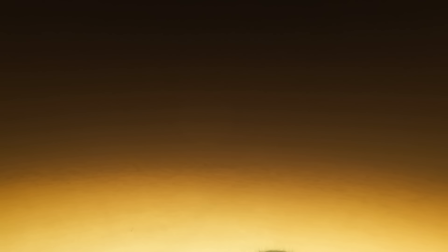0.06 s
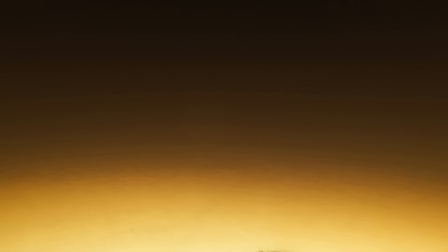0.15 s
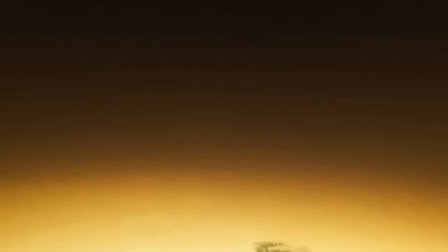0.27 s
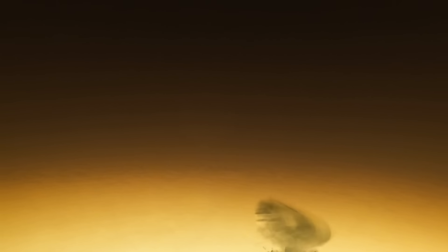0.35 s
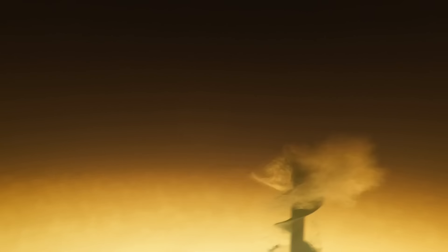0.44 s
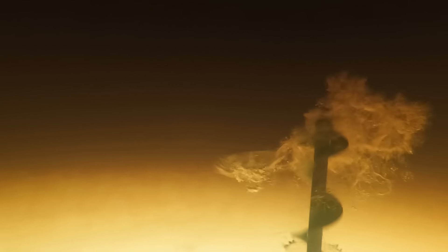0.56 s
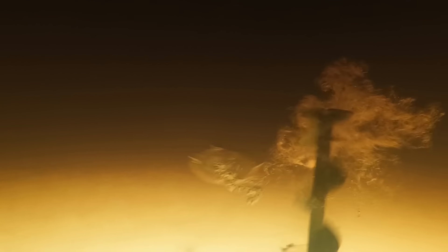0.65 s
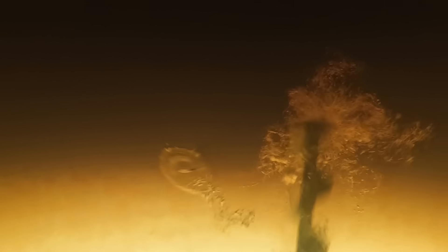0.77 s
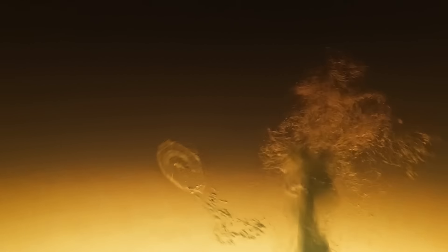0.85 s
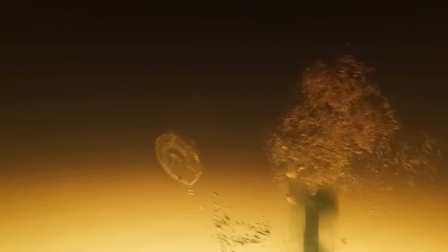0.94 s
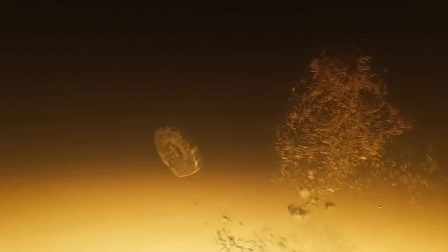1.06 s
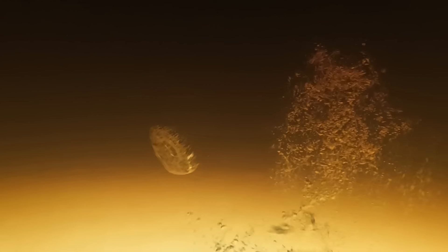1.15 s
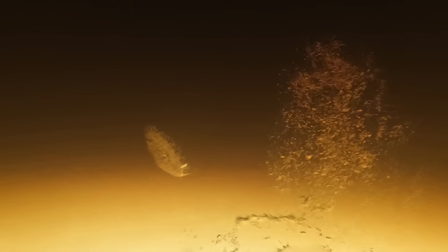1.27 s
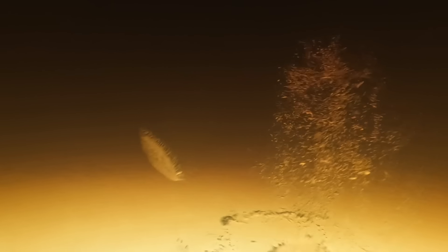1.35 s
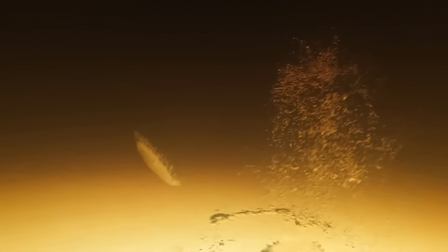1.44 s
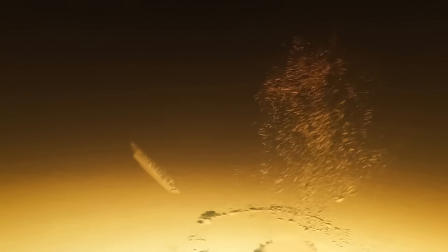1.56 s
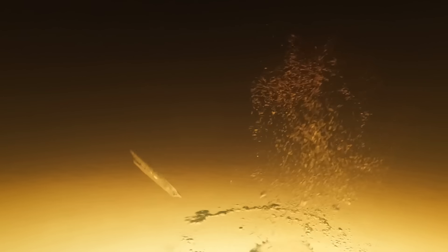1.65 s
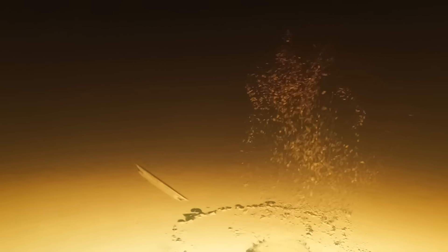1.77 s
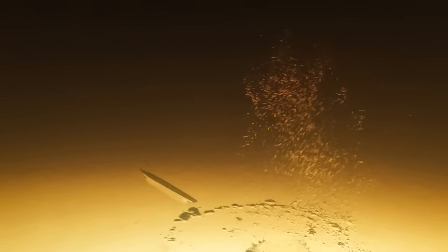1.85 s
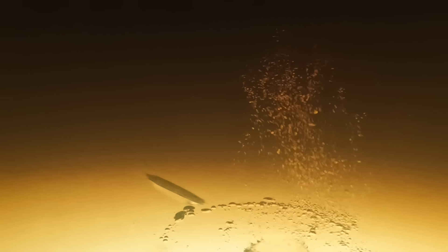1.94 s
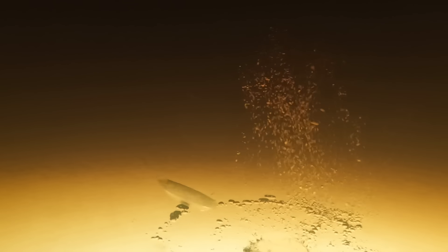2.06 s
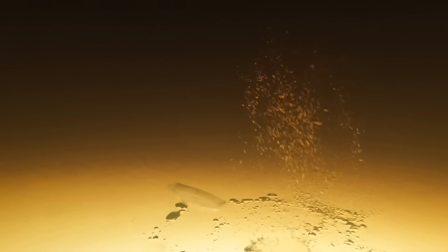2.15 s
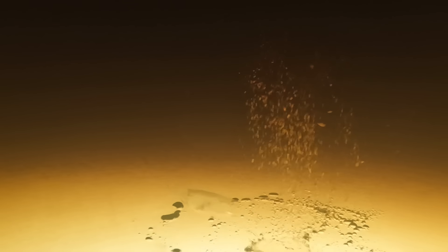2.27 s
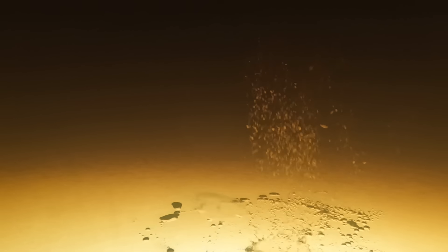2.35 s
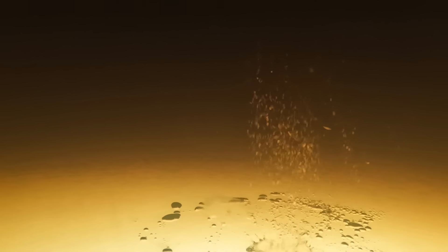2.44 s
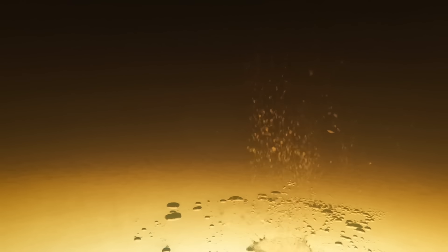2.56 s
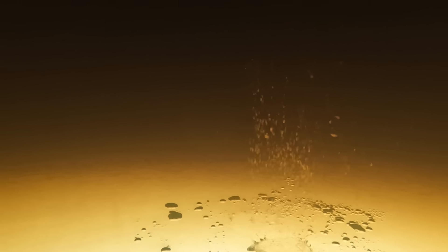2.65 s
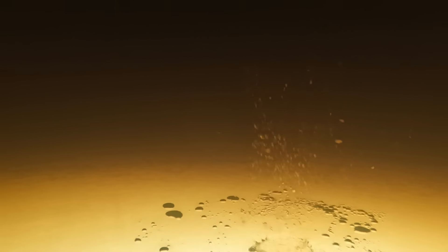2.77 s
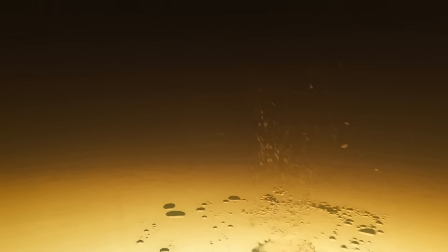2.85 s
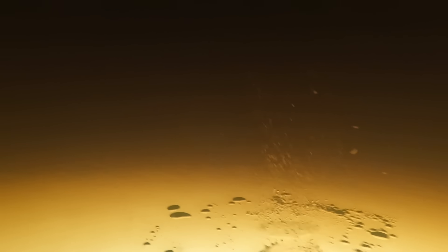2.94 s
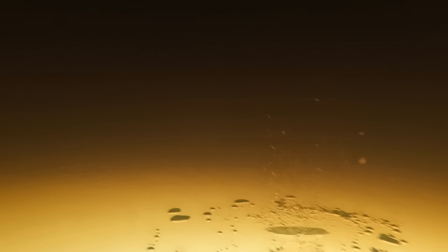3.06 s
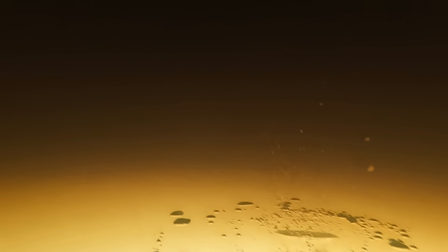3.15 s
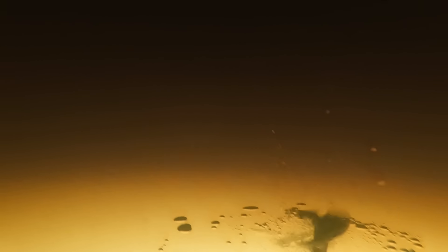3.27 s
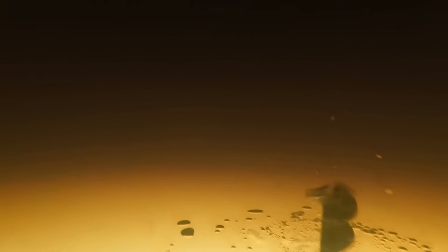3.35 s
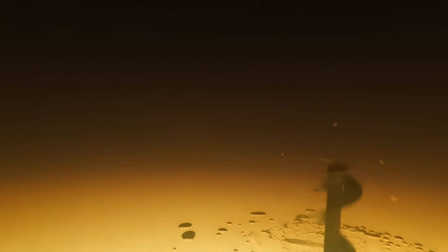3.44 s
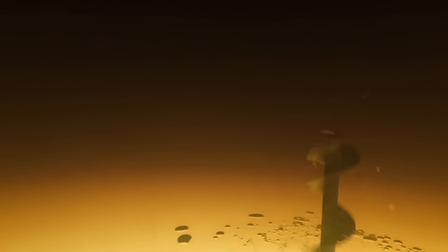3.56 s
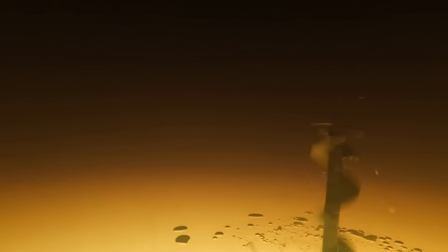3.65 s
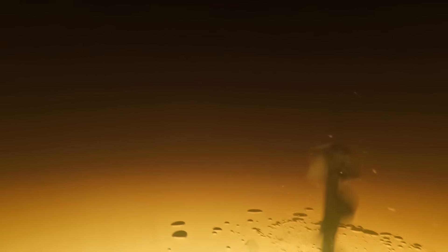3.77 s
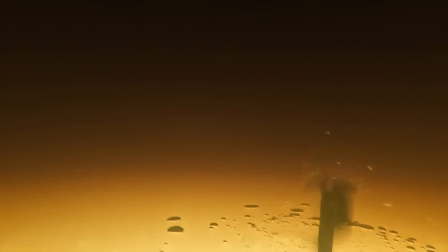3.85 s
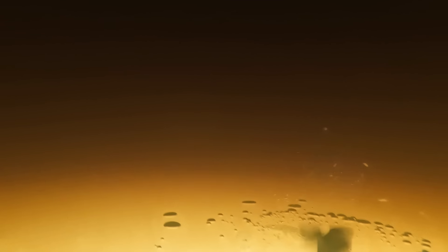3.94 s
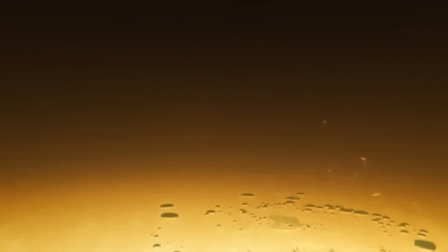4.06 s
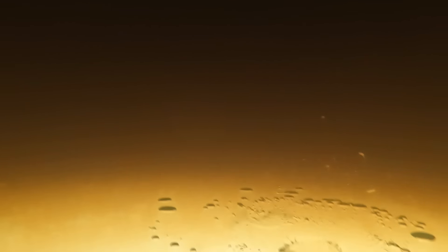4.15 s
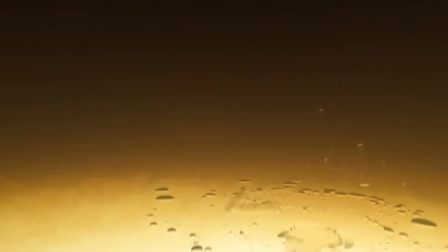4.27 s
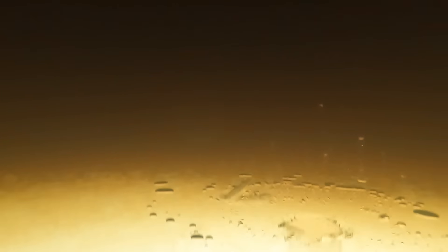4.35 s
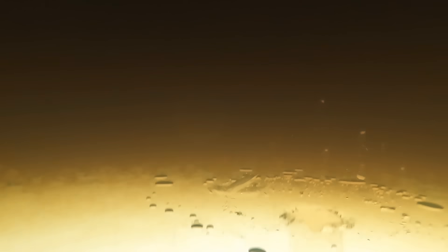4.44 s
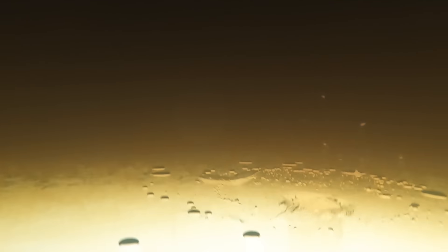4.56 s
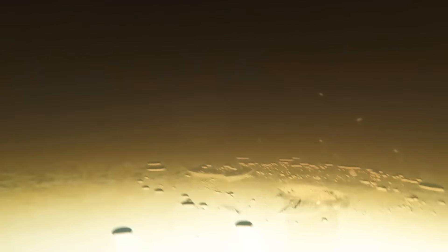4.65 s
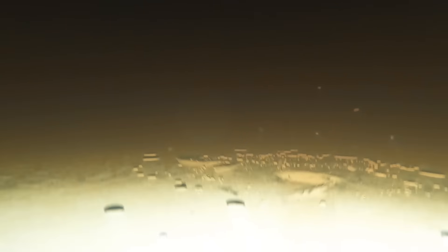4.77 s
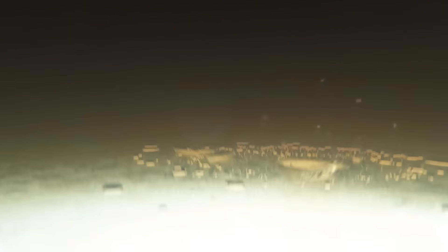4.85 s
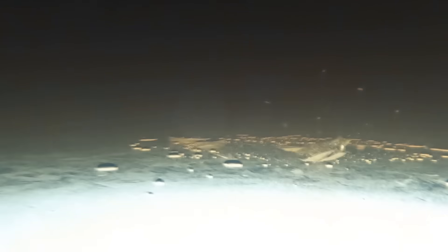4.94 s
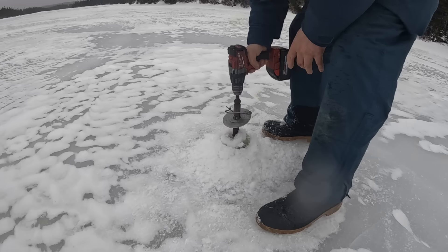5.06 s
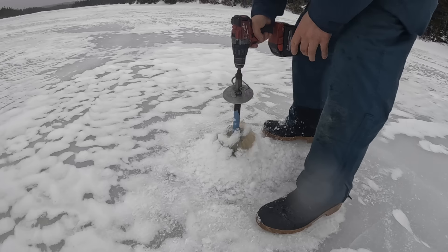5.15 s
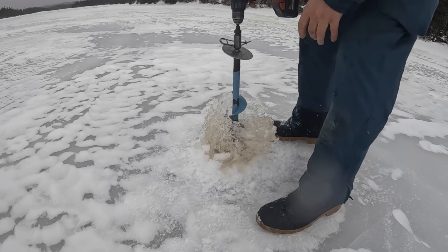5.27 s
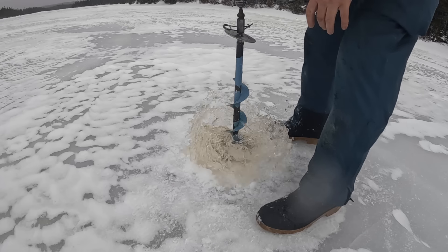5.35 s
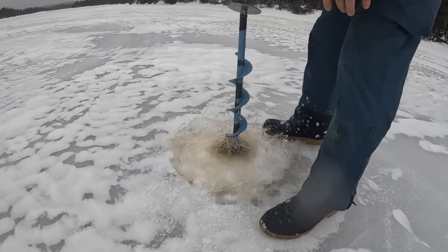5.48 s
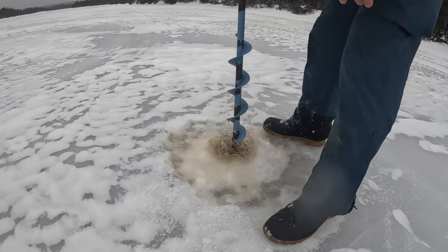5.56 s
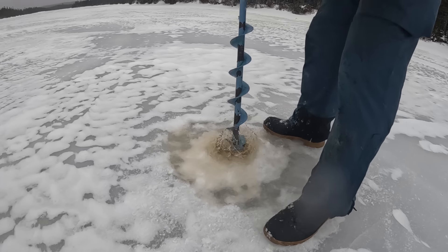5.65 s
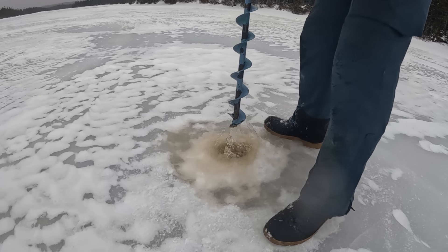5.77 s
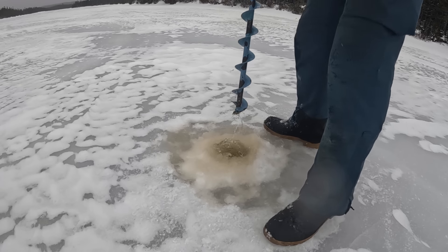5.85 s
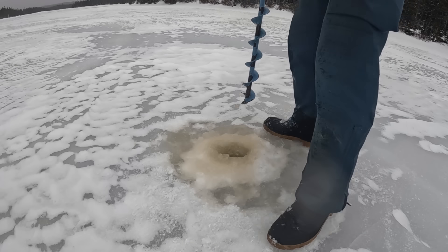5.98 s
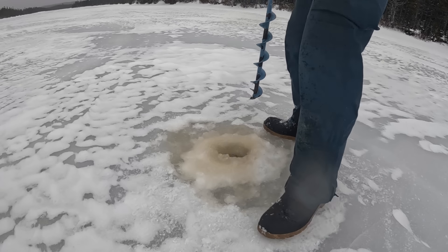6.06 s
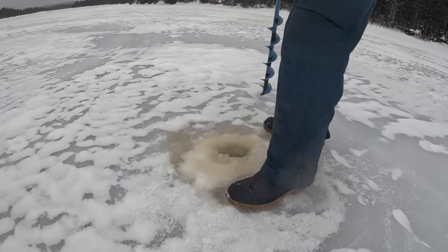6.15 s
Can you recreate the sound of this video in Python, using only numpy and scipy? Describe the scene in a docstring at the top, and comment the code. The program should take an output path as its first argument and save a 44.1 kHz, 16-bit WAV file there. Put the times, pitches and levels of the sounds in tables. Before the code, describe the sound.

Muffled underwater churning, knocks and gulping bubbles as an auger breaks through lake ice, then abruptly open air with steel rattle, sinking drill whine and slush.

```python
"""Dull churning, knocks and scrapes are heard first, under lake ice, as a drill-driven steel auger breaks through.
Filtered noise and crowds of decaying sines make the churning; gulps, bubbles and ice ticks are separate sines.
The listening point then jumps from a sealed case in the water to the air, where the auger is pulled out:
noise and impulses excite its steel modes, slush splashes as shaped noise and the drill's two-partial whine sinks.
Lumpy low noise is the wind that buffets the microphone."""
import sys
import numpy as np
from scipy.fft import rfft, irfft, next_fast_len
from scipy.io import wavfile
from scipy.ndimage import map_coordinates

SR = 44100
rng = np.random.default_rng(int(sys.argv[2]) if len(sys.argv) > 2 else 0)


def store_pcm(level_fs):
    """Save levels as 16-bit WAV."""
    pcm = np.round(np.clip(level_fs, -1, 1) * 32767).astype(np.int16)
    wavfile.write(sys.argv[1], SR, np.atleast_2d(pcm).T)


N = 273861

# Churning under the ice, before its unevenness: t/s, thud level/dB, scrape level/dB, fizz level/dB
CHURNING_LEVELS = [(0, -17.5, -47.5, -40.5), (.414, -18.5, -41, -43), (.42, -14, -39, -47),
                   (.78, -30, -42.5, -59), (.808, -20, -36.5, -56.5), (1.174, -25.5, -49.5, -57),
                   (1.475, -26.5, -53.5, -50.5), (1.49, -30.5, -62, -66), (1.63, -52.5, -60.5, -66.5),
                   (2.13, -62, -72.5, -84.5), (2.586, -53, -68.5, -82.5), (2.845, -41.5, -66, -75.5),
                   (2.848, -22.5, -49, -49.5), (3.07, -23, -51, -44.5), (3.4, -28, -42, -54.5),
                   (3.462, -27, -30.5, -46), (3.99, -32.5, -35, -53), (4.21, -27.5, -31.5, -42.5),
                   (4.4, -18, -39.5, -41), (4.425, -38, -53, -54.5), (4.55, -43.5, -53.5, -59.5),
                   (4.765, -59, -60, -70.5), (4.88, -50, -63, -67.5), (4.886, -32, -63, -66),
                   (5.017, -29.5, -61, -65.5), (5.03, -20.5, -44, -59)]
# Flights strike and skid on the wall of the hole: t/s, thud level over churning/dB,
# scrape strength over churning/dB (scaled per layer), nominal length/s (limited and scaled per layer)
KNOCKS = [(0.106, -6, 17.7, 0.0027), (0.697, 13, 13, 0.014), (0.824, 5, 18, 0.006),
          (0.831, 3.5, 14.5, 0.008), (.851, -2, 7.5, 0.0054), (0.876, 1, 2.5, 0.021), (0.917, 3, 8.9, 0.03),
          (0.989, 4.5, 9.5, 0.036), (1.021, 5, 11.5, 0.0153), (1.105, 7, 13, 0.0086), (1.131, 5, 10, 0.02),
          (1.152, 12, 7.5, 0.035), (1.232, 6, 6, 0.04), (1.266, 3, 11, 0.012), (1.291, -11, 3, 0.012),
          (1.417, 5.5, 11.5, 0.0076), (2.847, 6, 8.2, 0.011), (2.929, 4.5, 5.9, 0.011),
          (2.983, 0.5, 3, 0.042), (3.235, 4, 11, 0.031), (3.288, 20.5, 6.5, 0.006), (3.377, -1, 11, 0.0048),
          (3.452, 11, 7.5, 0.013), (3.509, 4, 16, 0.0078), (3.538, 9, 11, 0.0069),
          (3.565, 9.5, 0.5, 0.0092), (3.598, 5, 7.5, 0.01), (3.616, 10, 9.5, 0.014),
          (3.654, 8.5, 11, 0.032), (3.696, 3, 11.5, 0.011), (3.714, 0, 5.5, 0.032), (3.745, -3, 11, 0.006),
          (3.795, 6, 14.5, 0.037), (3.848, 11, 11, 0.021), (3.869, 8, 15.5, 0.012), (3.902, 11, 14, 0.048),
          (3.97, 16, 15.5, 0.011), (4.023, 22, 19, 0.01), (4.042, 13, 15, 0.016), (4.129, 8, 13, 0.013),
          (4.167, 8, 7.5, 0.04), (4.445, 12.5, 9.7, 0.012), (4.885, 16.5, 24, 0.0077)]
# Flights lose contact for a moment: t/s, depth/dB
CONTACT_LULLS = [(0.452, 10.5), (.962, 11.5), (1.054, 3.5), (1.091, 3), (2.91, 6.5), (3.525, 6),
                 (3.583, 3.5), (3.642, 3.5), (3.688, 5), (3.785, -1.5), (3.835, 7), (3.952, 14),
                 (4.088, 5.5), (4.112, 4), (.79, 3), (1.122, 3)]
# Relative spectrum of the thuds: f/Hz, level/dB
THUD_SPECTRUM = [(29, -40.5), (50, -4.5), (109, 0), (199, -6), (289, 0.5), (386, -5.5), (437, -3.5),
                 (555, -5), (704, -9.5), (829, -19), (1000, -24.5), (1300, -61), (2200, -120)]
# Relative spectrum of the scraping: f/Hz, level/dB
SCRAPE_SPECTRUM = [(350, -26), (600, -9.5), (792, 4), (912, -10), (1030, 0), (1240, -4), (1600, -4),
                   (1700, -4.5), (2120, 3), (2220, 0.5), (2660, -22), (2800, -19.5), (3640, -55),
                   (6160, -120)]
# Relative spectrum of the fizz: f/Hz, level/dB
FIZZ_SPECTRUM = [(1530, -38.5), (2670, -16), (3220, -6), (3590, 2), (3820, 2.5), (4270, -3), (5030, -6),
                 (6140, -36), (7500, -35), (9750, -63), (16500, -120)]
# Booming resonances of the sealed case: f/Hz, width/Hz, level/dB
CASE_MODES = [(126.3, 16, -2.5), (292, 54, 9.5)]
# Resonances of the flooded auger: f/Hz, width/Hz, level/dB
SHAFT_MODES = [(780, 150, -14), (1090, 14, -9), (1394, 24, 5.5), (1565, 9.2, 15.5), (2020, 290, -0.5)]
# A flight drags and the flooded shaft sings: t/s, drive level/dB, length/s
SQUEALS = [(0.865, -40, .07), (3.916, -36.5, 0.025), (4.153, -28, 0.04), (4.244, -36, .07)]
# Blades shave ice: t/s, level/dB
SHAVING_LEVEL = [(0, -55), (.38, -59.5), (.43, -100), (3.22, -100), (3.237, -46.5), (3.255, -100)]
# Relative spectrum of the shaving: f/Hz, level/dB
SHAVING_SPECTRUM = [(4000, -61.5), (5000, 6), (8800, -11.5), (9600, -30), (15000, -30)]
# Large air pockets gulp through the hole: t/s, level/dB, starting f/Hz, t60/s (limited in use)
GULPS = [(0.387, -9, 100.6, 0.066), (0.5, -5.5, 109.6, 0.17), (0.899, -5, 444, 0.053),
         (0.924, -1.5, 454, 0.067), (.972, -2, 110, 0.025), (0.994, -3, 400, 0.022),
         (1.066, -10, 483, 0.07), (1.106, -7.5, 254, .02), (1.144, -5, 92.5, 0.038),
         (1.229, -13.5, 415, 0.27), (1.409, -18, 171, 0.27), (1.534, -19, 308, 0.15),
         (2.574, -33.5, 254, 0.17), (2.654, -30, 212, 0.25), (2.739, -31.5, 295, 0.17),
         (2.855, -0.5, 114, 0.013), (2.865, 5, 357, 0.013), (2.932, -12, 266, 0.032),
         (2.964, -8, 286, 0.075), (3.018, -5, 264, 0.11), (3.054, -7.5, 292, 0.11), (3.105, -4, 281, 0.1),
         (3.287, -11, 292, 0.2), (3.467, -14.5, 286, 0.35), (4.0243, 2, 175, 0.013), (4.128, -4, 294, 0.02),
         (4.237, -11, 176, 0.032), (4.52, -22.5, 344, 0.031), (4.8, -27.5, 560, 0.033),
         (4.8939, 6.5, 277, 0.022), (4.947, 0, 264, 0.043)]
# Bubbles pinch off: t/s, level/dB, start f/Hz, end f/Hz, length/s, exponent that delays the rise
BUBBLES = [(1.8048, -41, 1400, 4800, 0.043, 3.8), (4.624, -31, 1350, 2450, 0.036, 2.1)]
# Ice chips tick under the sheet: t/s, level before the case's filter/dB, f/Hz
TICKS = [(1.535, -26, 703), (1.73, -35, 775), (1.8045, -22, 606), (2.274, -43, 720), (2.329, -29, 860),
         (2.41, -40, 800), (2.545, -34, 830), (2.733, -29, 840), (2.777, -15, 1200), (2.807, -37, 1500),
         (4.5985, -31, 775), (4.6232, -15, 613), (4.751, -32, 1900)]
# Something nudges the case: t/s, level/dB
NUDGES = [(4.589, -29), (4.749, -27), (4.761, -30), (4.998, -27)]
# A faint squeaky rub: t/s, level/dB
RUB_LEVEL = [(2.075, -84), (2.1, -60), (2.14, -57), (2.19, -99.5)]
# Water sways the case: t/s, level/dB
SWAY_LEVEL = [(0.0, -31), (0.47, -20.5), (0.7, -40), (0.97, -27.5), (1.67, -44.5), (3.25, -27),
              (3.42, -38.5), (3.84, -25), (4.66, -37.5), (5.03, -28)]
# Relative spectrum of the sway: f/Hz, level/dB
SWAY_SPECTRUM = [(7.1, -22.5), (14, 6.5), (25, -6.5), (45, -10.5), (90, -25.5), (120, -61), (200, -120)]
# Modes of the steel auger in air: f/Hz, level/dB, t60/s
STEEL_MODES = [(1865, -8.5, 0.1), (1908, -4, 0.038), (4340, 0, 0.09), (4384, -1, 0.15), (4520, -11, 0.05),
               (7558, -14, 0.07), (8995, -15, 0.05), (12030, -11, 0.045)]
# The rim of the hole strikes the steel; mean drive of: t/s, middle modes level/dB, low modes level/dB,
# top modes level/dB
RATTLES = [(5.075, 35, 28, 20), (5.105, 27.5, 31.5, 11.5), (5.1138, 46, 30.5, 23),
           (5.127, 37.5, 33.5, 40.5), (5.145, 25, 21.5, 36), (5.204, 24.5, 22.5, 37), (5.256, 33, 36.5, 39),
           (5.298, 31.5, 24, 35.5), (5.33, 33.5, 30, 36), (5.364, 38.5, 24.5, 42.5), (5.411, 35, 20, 26),
           (5.431, 34, 25, 27), (5.468, 30, 23, 28.5), (5.49, 33.5, 28.5, 31), (5.6252, 25.5, 24.5, 20),
           (5.695, 31.5, 20, 28), (5.867, 19, 23.5, 20), (5.904, 27.5, 23, 21.5)]
# Flights rub the rim; mean drive of: t/s, middle modes level/dB, low modes level/dB
RUBBING = [(5.03, -2, -4), (5.068, -8, -1), (5.076, 13, 5), (5.098, 9, 10), (5.135, 13, 19),
           (5.147, -9, -5.5), (5.225, -8, -4), (5.25, 3, 15), (5.345, 6, 7), (5.372, 3, 2.5),
           (5.38, -14.5, -6.5), (5.404, -15, -2.5), (5.412, 7.5, -2), (5.455, -7, -10.5),
           (5.495, 9.5, 14.5), (5.52, -5.5, 3.5), (5.6, -6.5, -3), (5.695, 1.5, 11.5), (5.71, -5, -23.5),
           (5.855, -27, -19), (5.868, -5.5, 8.5), (5.93, -2.5, 8), (5.94, -30, -29.5), (6.21, -56, -35)]
# Gear mesh of the drill: t/s, mean f/Hz, level/dB, octave level/dB (both flutter)
WHINE = [(5.12, 3000, -60, -60), (5.16, 3090, -41, -39), (5.26, 3110, -35, -37), (5.3, 3070, -29, -44),
         (5.335, 2870, -28, -47), (5.353, 2550, -27, -47), (5.373, 2000, -33, -55), (5.39, 1600, -60, -70)]
# In the air, while and after slush pours off: t/s, wind level/dB, slush level/dB, spray level/dB
AIR_LEVELS = [(5.03, -21.5, -26, -28.5), (5.064, -35, -33, -30.5), (5.33, -39.5, -28, -34),
              (5.41, -33, -24.5, -34), (5.55, -34.5, -36, -43.5), (5.7, -37.5, -34.5, -39),
              (5.71, -33, -46, -49.5), (5.77, -27.5, -46.5, -56), (5.82, -35.5, -47.5, -56.5),
              (5.86, -32, -50, -57), (5.87, -32, -43, -51.5), (5.93, -28.5, -43, -54.5),
              (5.95, -25.5, -52, -56.5), (6.035, -25.5, -56, -57.5), (6.05, -26, -42, -57.5),
              (6.1, -27, -48, -56.5), (6.13, -27.5, -57.5, -67), (6.21, -25.5, -36.5, -46.5)]
# Lumps of slush splat on the ice: t/s, level/dB
SPLATS = [(5.036, -19.5), (5.2542, -15.5), (5.3398, -22.5), (5.408, -18.5), (5.4509, -18), (5.505, -19),
          (5.524, -25), (5.537, -23.5), (5.645, -15), (5.737, -30.5), (5.764, -32), (5.792, -32.5),
          (5.8693, -27), (5.885, -25.5), (5.9032, -24), (5.963, -34.5)]
# Relative spectrum of the slush: f/Hz, level/dB
SLUSH_SPECTRUM = [(150, -5.5), (250, -9), (484, 3), (590, -4), (678, 2.5), (1660, -7.5), (1880, 0.5),
                  (2190, -0.5), (4000, -9), (5200, -50.5), (8800, -120)]
# Relative spectrum of the spray: f/Hz, level/dB
SPRAY_SPECTRUM = [(1760, -27), (3000, 3), (3870, -19), (4410, 2.5), (5050, -3), (8990, -12.5), (10700, -37),
                  (11600, -15.5), (12200, 0.5), (15500, -27.5)]
# Relative spectrum of a splat: f/Hz, level/dB
SPLAT_SPECTRUM = [(300, -30), (800, -8), (2600, 0), (4500, -12), (8000, -34), (15000, -60)]
# Drops fall back into the open hole: t/s, level/dB, start f/Hz, end f/Hz, length/s
PLOPS = [(5.04, -25.5, 730, 895, 0.02), (5.739, -37.5, 623, 700, 0.039), (5.908, -37.5, 764, 890, 0.028)]
# Relative spectrum of the wind: f/Hz, level/dB
WIND_SPECTRUM = [(8.8, -33), (15, -11), (50, -4.5), (119, -14.5), (183, -20), (272, -30), (400, -38.5),
                 (520, -71), (880, -120)]

CUT_S = 5.033  # from water to air
BREAKTHROUGH_S, STEADY_SHARE = .4, .4  # before breakthrough the unevenness keeps only this share
LULL_S = 0.02  # half length
SCRAPE_GROWS = 0.88  # dB gained by the scrape for each dB of a knock's strength
FIZZ_GROWS = 1.22  # dB gained by the fizz for each dB of a knock's strength
EDGE_DB, EDGE_SHARE = -9.5, 0.13  # sharp front of a knock, under its scrape, and its share of the length
SQUEAL_HZ, SQUEAL_WIDTH_HZ = 2233, 27
NOTCH_HZ, NOTCH_WIDTH_HZ = 2720, 900  # the sealed case is nearly deaf here
CRUMBS, CRUMB_DB = 90, -46  # small chips at random times: how many, lowest level + 5 dB
NUDGE_S = .0018  # time constant
TOP_RUB_DB = -8  # rubbing drives the top modes less than the middle ones
BUILDUP_HZ = 1000  # width of a second resonance: modes build up gradually and the gaps between stay dark
SPLIT_HZ, TOP_HZ = 11300, 15700  # treble leans right above the first; band limit


def churning():
    """Stick and slip: thud, scrape and fizz share one unevenness, and knocks lift all three."""
    thud_db, scrape_db, fizz_db = curves(CHURNING_LEVELS)
    s, low_db, strength_db, length = np.transpose(KNOCKS)
    length = np.clip(length, .003, .08)
    after_onset = (s * SR).astype(int) + SR // 200
    t = np.arange(N) / SR
    lull_db = sum(depth * np.exp(-((t - at) / LULL_S) ** 4) for at, depth in CONTACT_LULLS)
    loose = np.where(t < BREAKTHROUGH_S, STEADY_SHARE, 1)
    uneven_db = loose * (2.3 * wobble(21.984) + 1.1 * wobble(70)) - lull_db

    boom = lambda f: shape(THUD_SPECTRUM)(f) * (1 + 0.67 * ringing(CASE_MODES)(f))
    thud_bubbles = gurgle(count=1200, low_hz=179.1, high_hz=808.0, cycles=14.2)
    rumble = rush(boom, 40, lumpy_db=3.4 * loose) + 0.54 * unit(filtered(thud_bubbles, boom))
    thud_knocks = bursts(s, thud_db[after_onset] + low_db, length, 0.00056)
    thud = filtered((amp(thud_db + uneven_db) + thud_knocks) * rumble, case_low_pass)

    rasp = lambda f: shape(SCRAPE_SPECTRUM)(f) * (1.6 + 0.55 * np.abs(ringing(SHAFT_MODES)(f)))
    scrape_bubbles = gurgle(count=1500, low_hz=693.0, high_hz=2470, cycles=12)
    grind = rush(rasp, 150, lumpy_db=1.5)
    grind += 0.72 * unit(filtered(scrape_bubbles, shape(SCRAPE_SPECTRUM)))
    skid_db = scrape_db[after_onset] + SCRAPE_GROWS * strength_db
    skids = bursts(s, skid_db, length, 0.0011)
    edges = bursts(s, skid_db + EDGE_DB, EDGE_SHARE * length, 0.00068)
    scrape = (amp(scrape_db + uneven_db) + skids + edges) * grind

    fizz_knock_db = fizz_db[after_onset] + FIZZ_GROWS * strength_db
    fizz_knocks = bursts(s, fizz_knock_db, 0.76 * length, 0.00073)
    fizz = (amp(fizz_db + uneven_db) + fizz_knocks) * rush(shape(FIZZ_SPECTRUM), 200, lumpy_db=3.0)
    return thud + water_low_pass(scrape + fizz)


def squeals():
    """Friction-driven resonance: bursts of noise excite one narrow mode of the flooded shaft."""
    density = np.sqrt(SR / np.pi / SQUEAL_WIDTH_HZ)  # makes up for the narrow band
    drag = bursts(*np.transpose(SQUEALS), attack=0.0038) * rng.standard_normal(N) * density
    mode = ringing([(SQUEAL_HZ, SQUEAL_WIDTH_HZ, 0)])
    return water_low_pass(filtered(drag, lambda f: mode(f) * notch(f)))


def shaving():
    """Brittle cutting: many unresolved fractures are treated as shaped steady noise."""
    return amp(curves(SHAVING_LEVEL)[0]) * unit(filtered(rng.standard_normal(N), shape(SHAVING_SPECTRUM)))


def gulps():
    """Volume resonance: each pocket of air rings at its own, slightly rising pitch."""
    out, t = np.zeros(N + SR), np.arange(SR // 4) / SR
    for s, db, hz, t60 in GULPS:
        ring = np.sin(2 * np.pi * hz * t * (1 + 0.08 * t)) * (1 - np.exp(-(t / 0.0015) ** 2))
        out[round(s * SR):][:len(t)] += amp(db - 60 * t / np.clip(t60, .015, .3)) * ring
    return filtered(out[:N], case_low_pass)


def pinched_bubbles():
    """Bubble resonance: each pinch-off is a decaying sine whose pitch rises late."""
    pops = sum(chirp(s, db, lambda u: hz0 + (hz1 - hz0) * u ** late, length)
               for s, db, hz0, hz1, length, late in BUBBLES)
    return filtered(pops, notch)


def ticks():
    """Impact radiation: a chip gives a short noise crunch and a few cycles at its pitch and an overtone."""
    out, t = np.zeros(N + SR), np.arange(SR // 20) / SR
    # random t/s, level/dB over a 10 dB range, f/Hz from 800 to 2000
    crumbs = rng.random((CRUMBS, 3)) * [CUT_S, 10, 1200] + [0, CRUMB_DB - 5, 800]
    for s, db, hz in [*TICKS, *crumbs]:
        crunch = amp(12 - 60 * t / 0.01) * rng.standard_normal(len(t))
        ring = np.sin(2 * np.pi * hz * t) + 0.45 * np.sin(2 * np.pi * 1.48 * hz * t)
        decay = amp(-60 * t * hz / 24 * hz / 800)  # higher chips die sooner
        out[round(s * SR):][:len(t)] += amp(db) * (crunch + decay * ring)
    muffled = lambda f: 1j * f / 400 / (1 + 1j * f / 400) / (1 + 1j * f / 2100) ** 5  # the case dulls it
    return filtered(out[:N], lambda f: muffled(f) * notch(f) * (f < 5600))


def nudges():
    """Damped displacement: one low push with a sudden start and no ring."""
    out, u = np.zeros(N + SR), np.arange(SR // 10) / SR / NUDGE_S
    for s, db in NUDGES:
        out[round(s * SR):][:len(u)] -= amp(db) * np.e * (.12 + u) * (1 - .4 * u) * np.exp(-u)
    return out[:N]


def squeaky_rub():
    """Resonant friction: steady noise passes two resonances."""
    resonances = ringing([(1850, 53, 7.5), (3220, 170, -4.0)])  # f/Hz, width/Hz, level/dB
    return amp(curves(RUB_LEVEL)[0]) * rush(resonances, 94, lumpy_db=0.0)


def sway():
    """Slow water flow past the case: very low noise swells and sinks."""
    return amp(curves(SWAY_LEVEL)[0]) * rush(shape(SWAY_SPECTRUM), 1.3, lumpy_db=-1.5)


def auger():
    """Modal excitation: rubbing drives the steel modes with noise; each blow starts them all at once."""
    s, db, low_db, top_db = np.transpose(RATTLES)
    rub_db, low_rub_db = curves(RUBBING)
    grip_db = 4.5 * wobble(45)
    low, middle, top = (low_rub_db, low_db), (rub_db, db), (rub_db + TOP_RUB_DB, top_db)
    drives = 2 * [low] + 3 * [middle] + 3 * [top]
    ring = 0
    for (hz, level, t60), (steady_db, blow_db) in zip(STEEL_MODES, drives):
        width_hz = np.log(1000) / np.pi / t60
        mode = ringing([(hz, width_hz, level + 10 * np.log10(t60))])
        buildup = ringing([(hz, BUILDUP_HZ, 0)])
        push = amp(steady_db + grip_db) * rng.standard_normal(N)
        push[(s * SR).astype(int)] += amp(blow_db + rng.normal(0, 2, len(s)))
        ring = ring + filtered(push, lambda f: mode(f) * buildup(f))
    return ring


def drill():
    """Gear meshing: a tone and its octave, whose pitch sinks as the trigger is let go."""
    hz, db, octave_db = curves(WHINE)
    phase = 2 * np.pi * np.cumsum(hz * (1 + .002 * wobble(80))) / SR
    running = db > np.min(db)
    whine = amp(db) * np.sin(phase) + amp(octave_db) * np.sin(2 * phase)
    return running * amp(wobble(50)) * whine


def slush_and_spray():
    """Many small impacts: lumpy noise crackles in fine grains, with bubbles and single splats."""
    _, slush_db, spray_db = curves(AIR_LEVELS)
    uneven_db = 2.2 * wobble(30)
    slush = amp(slush_db + uneven_db) * rush(shape(SLUSH_SPECTRUM), 250, lumpy_db=3.0)
    slush += amp(slush_db - 9.5) * gurgle(count=2000, low_hz=594.5, high_hz=3200, cycles=5)
    spray = amp(spray_db + uneven_db) * rush(shape(SPRAY_SPECTRUM), 320, lumpy_db=3.5)
    s, db = np.transpose(SPLATS)
    splat_noise = unit(filtered(rng.standard_normal(N), shape(SPLAT_SPECTRUM)))
    splats = bursts(s, db, np.full(len(s), .003), 0.00024) * splat_noise
    return slush + spray + splats


def plops():
    """Cavity resonance: each falling drop gives a decaying sine with a steady rise in pitch."""
    return sum(chirp(s, db, lambda u: hz0 + (hz1 - hz0) * u, length) for s, db, hz0, hz1, length in PLOPS)


def wind():
    """Turbulent pressure on the microphone: low noise comes in lumps."""
    return amp(curves(AIR_LEVELS)[0]) * rush(shape(WIND_SPECTRUM), 14, lumpy_db=3)


def gurgle(count, low_hz, high_hz, cycles):
    """Bubble-crowd superposition, rms 1: each rings a few cycles and rises in pitch."""
    draw = rng.random((count, 3))  # start, pitch, strength
    hz = low_hz * (high_hz / low_hz) ** draw[:, 1:2]
    t = np.arange(SR // 25) / SR
    age = t * hz / cycles
    strength = -np.log(1 - draw[:, 2:])
    ring = strength * age * np.exp(-3 * age) * np.sin(2 * np.pi * hz * t * (1 + 0.05 * age))
    at = (draw[:, :1] * N).astype(int) + np.arange(len(t))
    return unit(np.bincount(at.ravel(), ring.ravel())[:N])


def chirp(s, db, hz, length):
    """Frequency modulation: a sine follows the pitches hz over its length and dies."""
    out, u = np.zeros(N + SR), np.linspace(0, 1, round(length * SR))
    tone = np.sin(2 * np.pi * np.cumsum(hz(u)) / SR)
    out[round(s * SR):][:len(u)] = amp(db - 16 * u) * (1 - u ** 8) * tone
    return out[:N]


def bursts(times, levels_db, lengths, attack):
    """Impulsive envelope: sudden rises fall away ever faster in dB."""
    out, t = np.zeros(N + SR), np.arange(SR // 4) / SR
    for s, db, length in zip(times, levels_db, lengths):
        fall_db = 9 * t / length + 2.6 * (t / length) ** 2
        out[round(s * SR):][:len(t)] += amp(db - fall_db) * (1 - np.exp(-t / attack))
    return out[:N]


def rush(response, rate, lumpy_db):
    """Modulated turbulence: coloured noise of rms 1 comes in lumps."""
    return unit(filtered(rng.standard_normal(N), response) * amp(lumpy_db * wobble(rate)))


def ringing(modes):
    """Modal sum: causal response of (f/Hz, width/Hz, level/dB) resonances with alternating signs."""
    return lambda f: sum((-1) ** k * amp(db) * 1j * f * w / (c * c - f * f + 1j * f * w)
                         for k, (c, w, db) in enumerate(modes))


def notch(f):
    """Antiresonance: the dip in the sealed case's response."""
    detuning = NOTCH_HZ ** 2 - f * f
    damping = 1j * f * NOTCH_WIDTH_HZ
    return (detuning + .1 * damping) / (detuning + damping)


def case_low_pass(f):
    """Transmission loss: the case's dip and a third-order treble loss."""
    return notch(f) / (1 + 1j * f / 3500) ** 3


def water_low_pass(x):
    """Low-pass transmission: the treble falls steeply above 6500 Hz."""
    return filtered(x, lambda f: 1 / np.sqrt(1 + (f / 6500) ** 12))


def shape(points):
    """Spectral envelope: gain through (f/Hz, level/dB) points on a log axis."""
    f, db = np.transpose(points)
    return lambda hz: amp(np.interp(np.log(hz + 1), np.log(f + 1), db))


def filtered(x, response):
    """Linear filtering: x times a complex response of frequency."""
    m = next_fast_len(N + SR // 2)
    return irfft(rfft(x, m) * response(np.fft.rfftfreq(m, 1 / SR)), m)[..., :N]


def wobble(rate):
    """Random modulation: a smooth curve with rate knots a second."""
    return map_coordinates(rng.standard_normal(int(N * rate / SR) + 4), [np.arange(N) * rate / SR])


def curves(rows):
    """Linear interpolation: one value per sample for each column after the time."""
    s, *cols = np.transpose(rows)
    return [np.interp(np.arange(N) / SR, s, c) for c in cols]


def unit(x):
    """Normalization to an rms of 1."""
    return x / np.sqrt(np.mean(x ** 2) + 1e-20)


def amp(db):
    """Logarithmic level: amplitude ratio of a level in dB."""
    return 10 ** (np.asarray(db) / 20)


def under_ice():
    """Superposition of the sources heard in the water."""
    cutting = churning() + squeals() + shaving()
    return cutting + gulps() + pinched_bubbles() + ticks() + nudges() + squeaky_rub() + sway()


def above_ice():
    """Superposition of the sources heard in the air."""
    return auger() + drill() + slush_and_spray() + plops() + wind()


def scene():
    """Superposition in one microphone on both channels: water gives way to air, over faint separate hiss."""
    air = np.clip((np.arange(N) / SR - CUT_S) / 0.003, 0, 1)
    mono = (1 - air) * under_ice() + air * above_ice()
    return np.array([mono, mono]) + amp(-103) * rng.standard_normal((2, N))


def record(dry):
    """Saturation and band limiting: peaks are rounded off and the highest treble leans to the right."""
    lean = np.array([[amp(-16.5) * np.exp(1.8j)], [amp(-6.0)]])  # left is also shifted in phase
    rounded = dry / (1 + np.abs(dry / .75) ** 4) ** (1 / 4)
    return filtered(rounded, lambda hz: np.where(hz > SPLIT_HZ, lean, 1) * (hz < TOP_HZ))


dry = scene()
out = record(dry)
store_pcm(out)
```